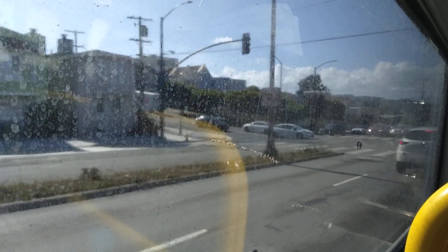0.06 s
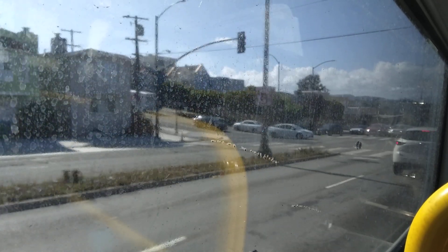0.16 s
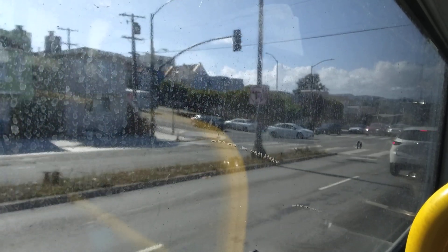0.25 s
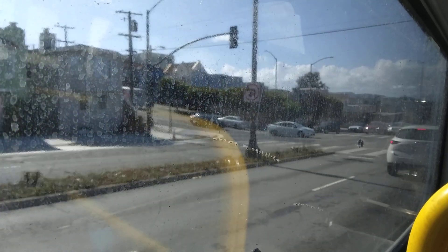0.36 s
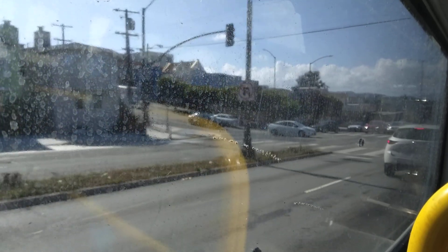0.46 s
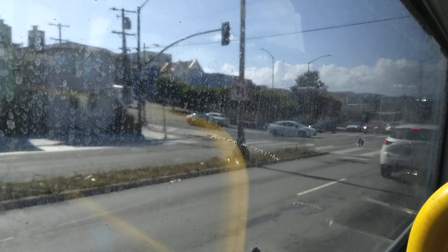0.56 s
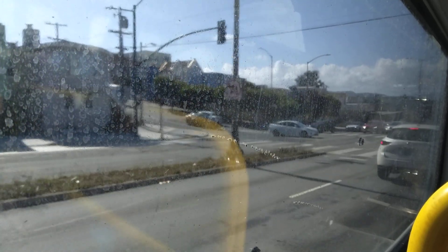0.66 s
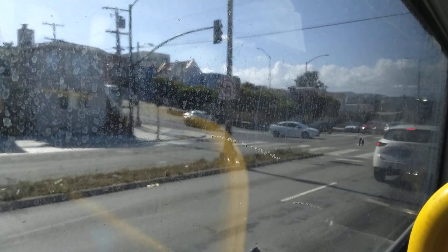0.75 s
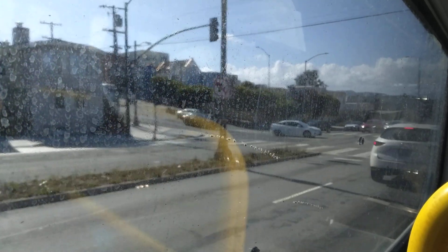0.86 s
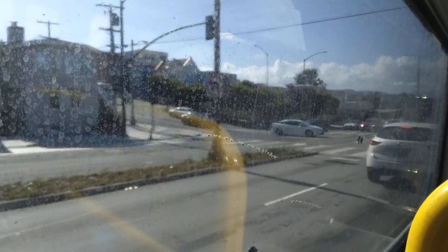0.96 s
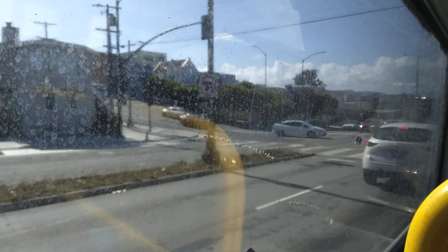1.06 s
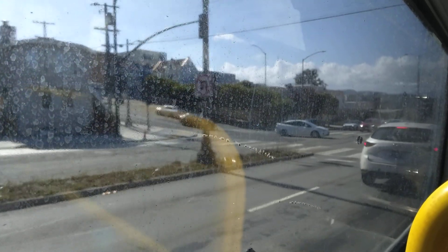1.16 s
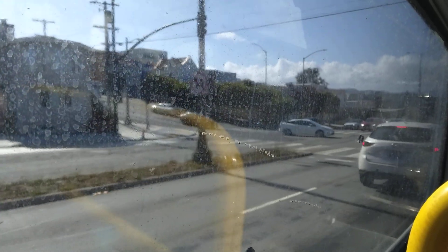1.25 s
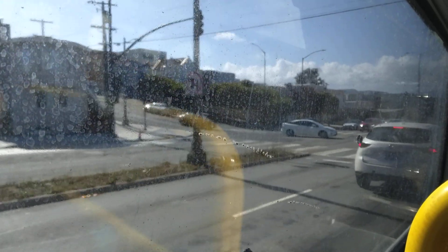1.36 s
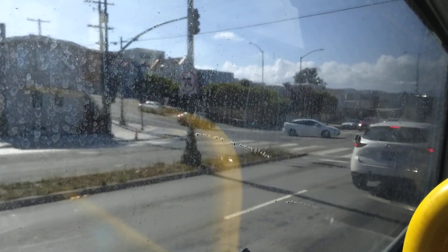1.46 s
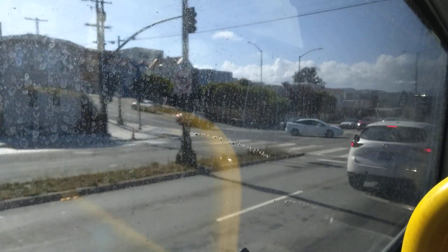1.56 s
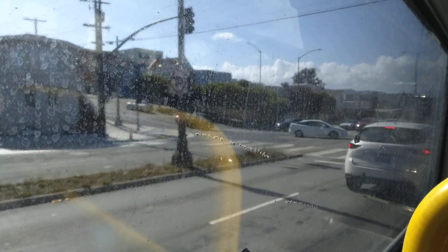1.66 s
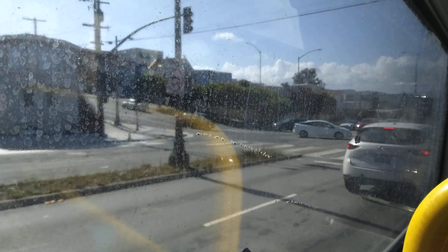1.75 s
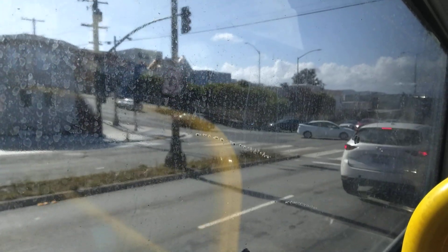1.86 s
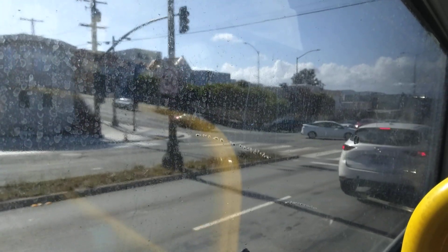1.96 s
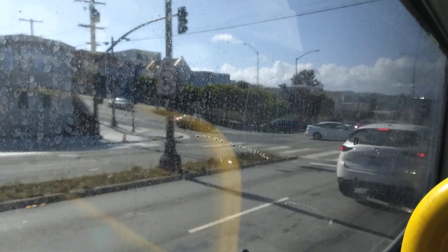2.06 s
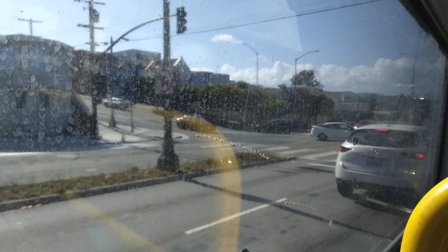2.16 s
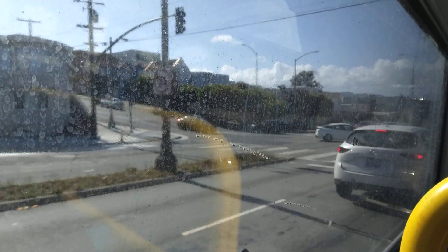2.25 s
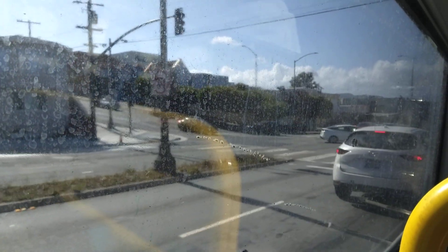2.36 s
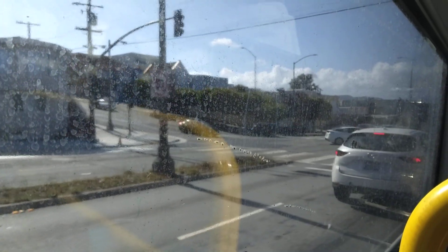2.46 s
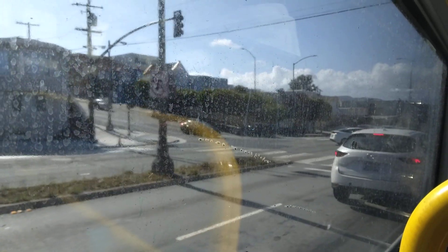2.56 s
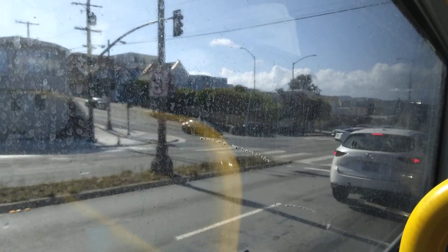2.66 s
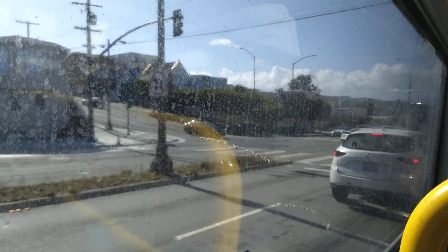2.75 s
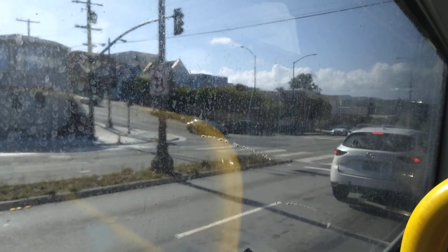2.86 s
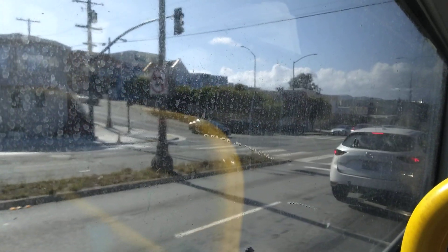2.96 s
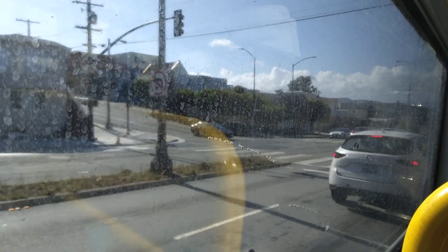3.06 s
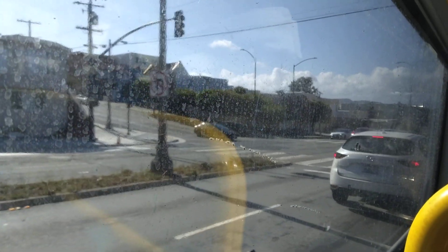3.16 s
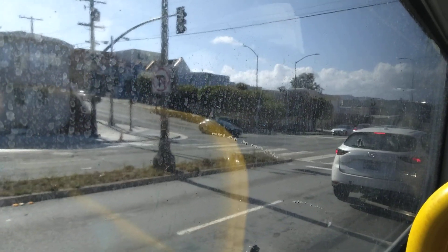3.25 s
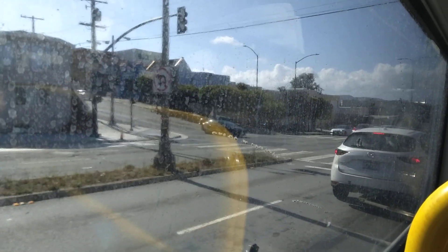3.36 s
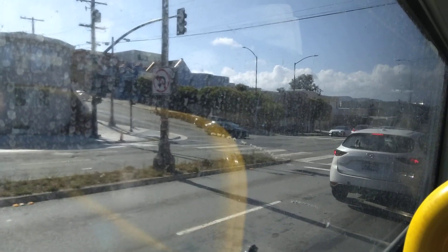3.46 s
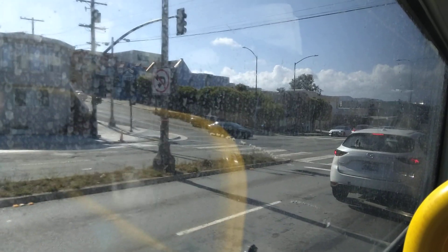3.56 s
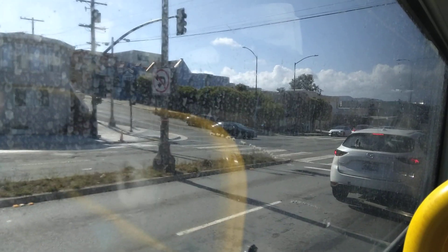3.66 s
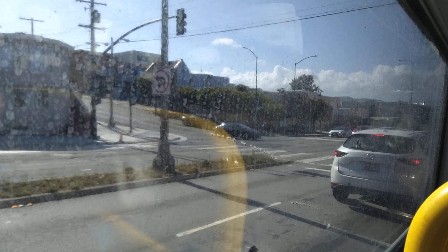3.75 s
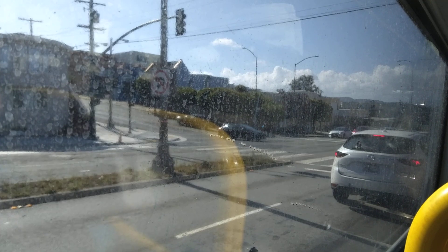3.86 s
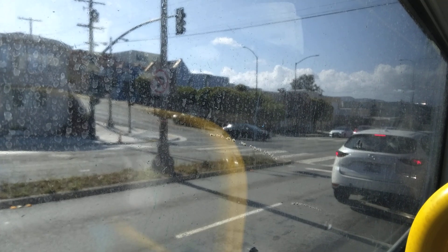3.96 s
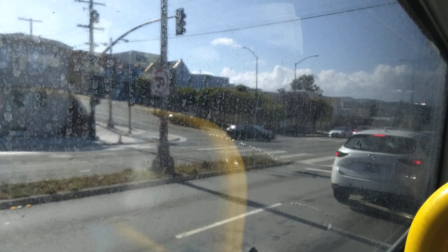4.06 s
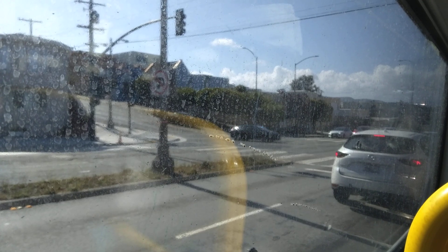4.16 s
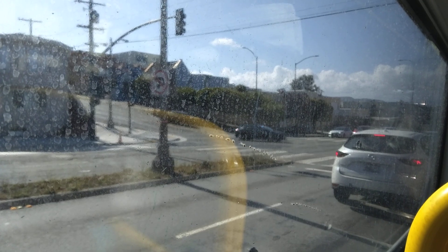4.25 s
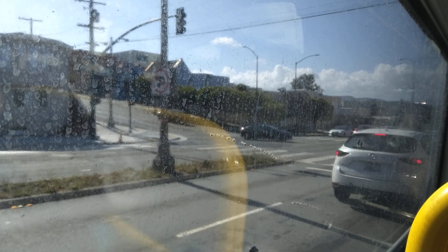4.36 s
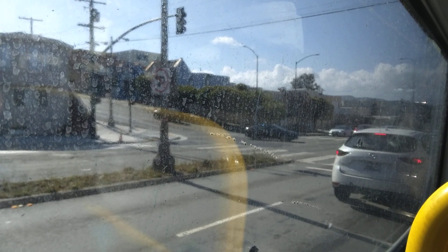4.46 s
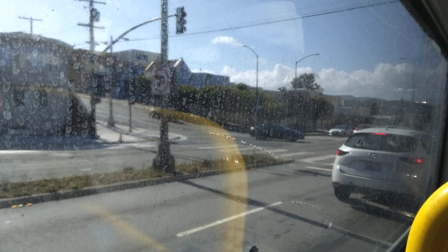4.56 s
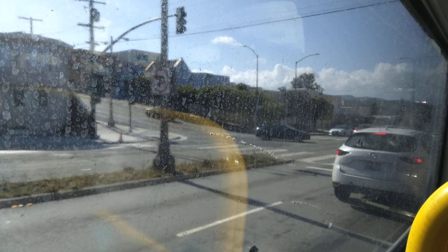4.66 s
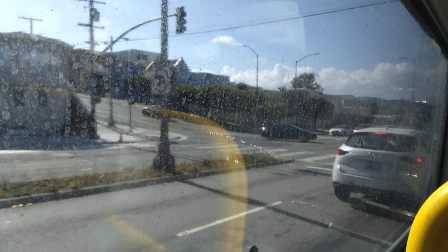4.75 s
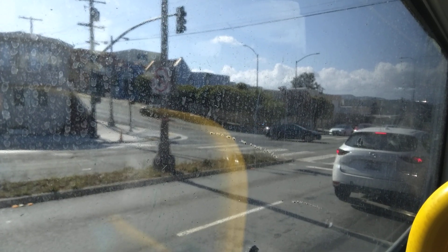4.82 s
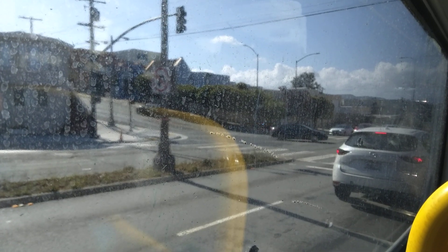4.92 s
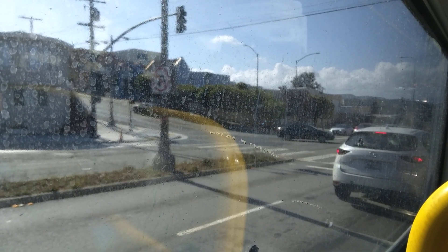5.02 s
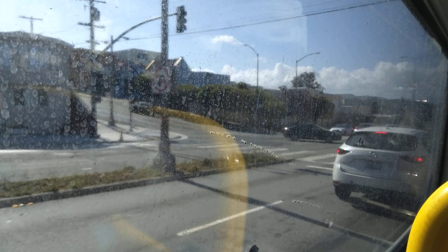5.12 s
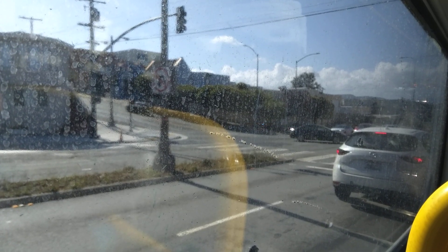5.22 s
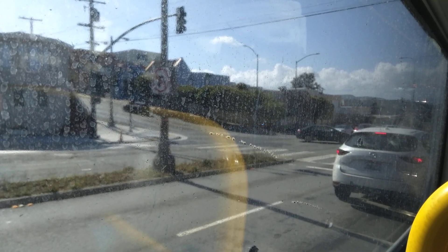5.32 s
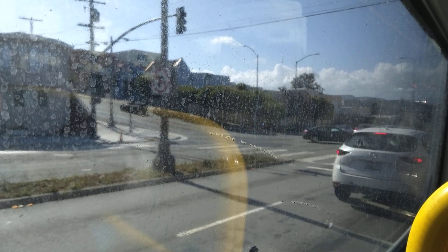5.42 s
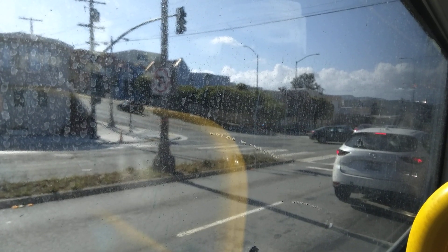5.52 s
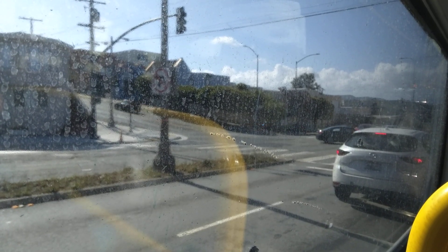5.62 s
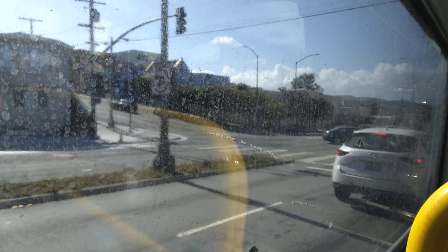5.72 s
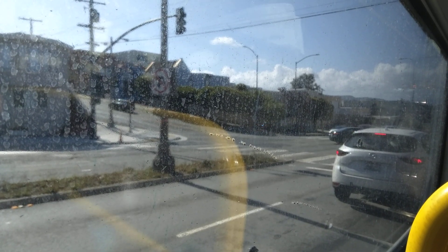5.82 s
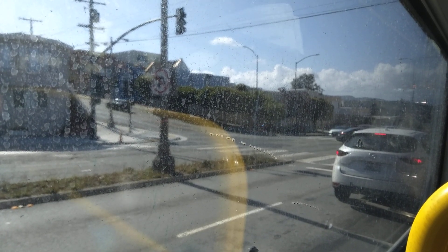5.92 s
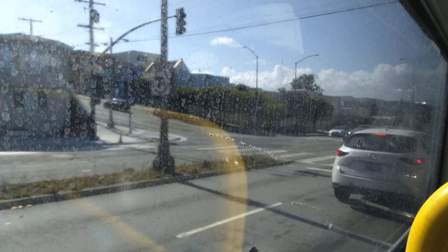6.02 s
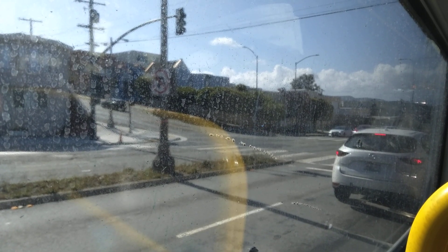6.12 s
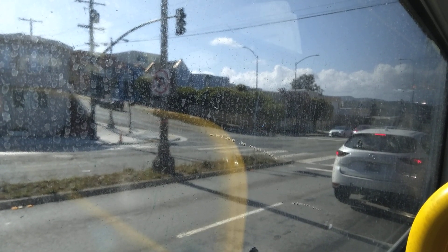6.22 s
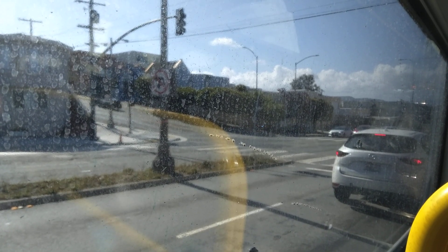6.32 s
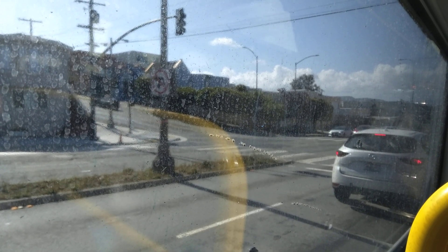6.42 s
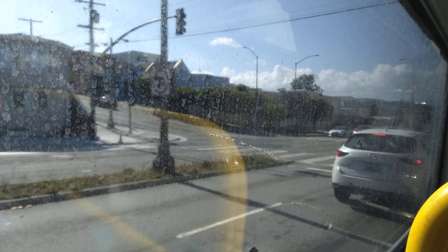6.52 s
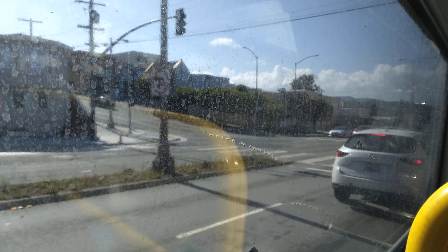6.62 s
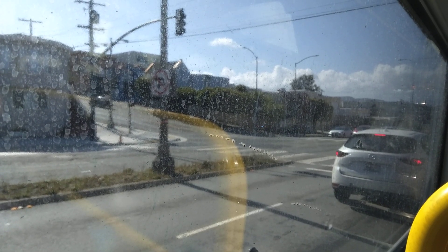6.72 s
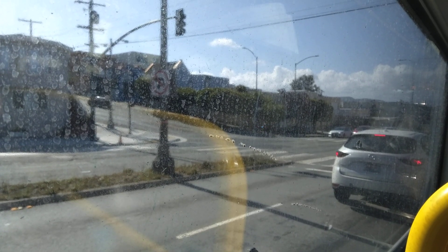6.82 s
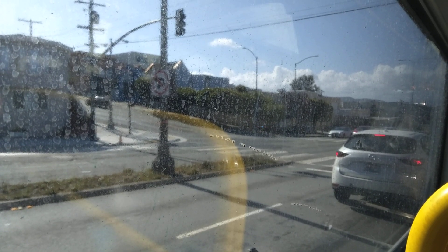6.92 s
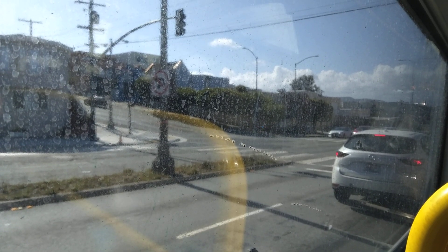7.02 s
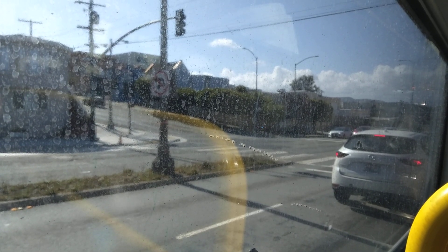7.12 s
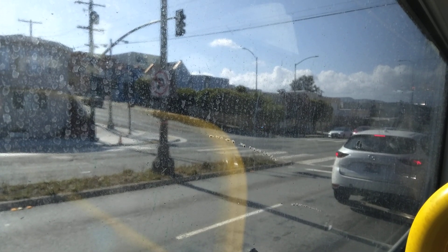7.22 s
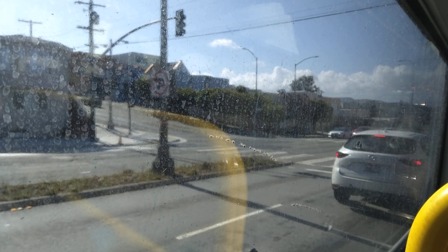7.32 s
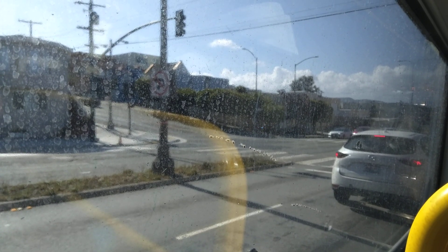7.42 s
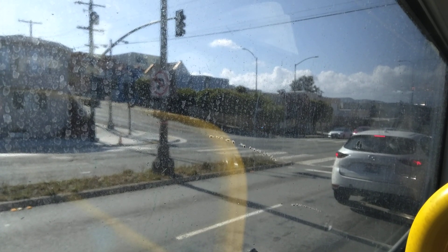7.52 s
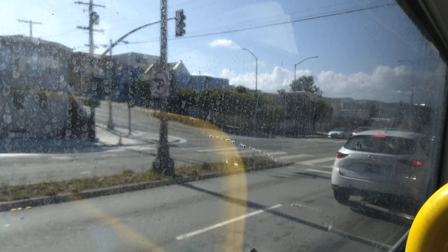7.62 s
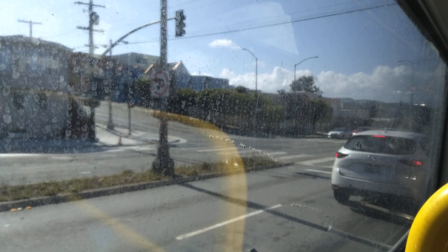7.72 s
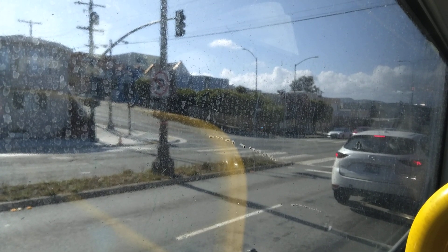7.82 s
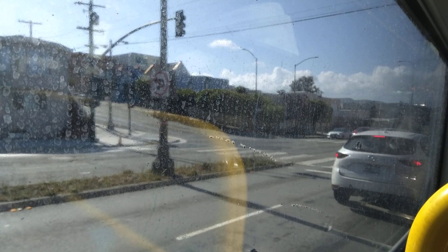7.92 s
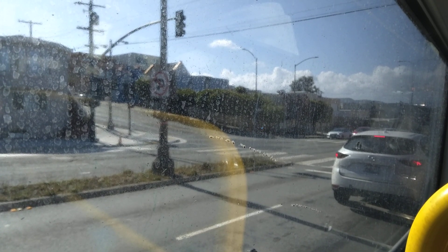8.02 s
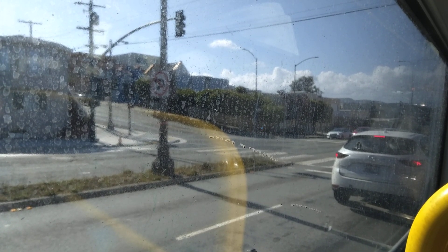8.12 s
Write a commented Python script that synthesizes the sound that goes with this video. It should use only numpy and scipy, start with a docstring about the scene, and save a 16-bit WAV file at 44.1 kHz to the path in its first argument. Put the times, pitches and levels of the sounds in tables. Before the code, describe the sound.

Inside a hybrid bus braking to a halt, an electric motor whine slides down, air hisses, fittings rattle, and a diesel idle drones on.

```python
"""Hybrid city bus braking to a halt

Heard from inside: a six-cylinder diesel idles at 700 rpm, its firings booming in the cabin over clatter.
The drive motor's gear whine falls through the body's resonances and the inverter sings near 8 kHz.
Brake air hisses, fittings rattle, pads rub, chirp and groan, and the body lurches to rest.
Tones are sines that wander in level and phase; hisses, rattles and rumble are coloured noise."""
import sys
import numpy as np
from scipy import signal
from scipy.fft import rfft, irfft
from scipy.io import wavfile
from scipy.ndimage import uniform_filter1d

SR = 44100
rng = np.random.default_rng(int(sys.argv[2]) if len(sys.argv) > 2 else 0)


def dump(signal):
    """Clip the signal to [-1, 1] and save it as 16-bit WAV at the path in sys.argv[1]."""
    limited = np.clip(np.atleast_2d(signal).T, -1, 1)
    pcm = np.round(limited * 32767).astype(np.int16)
    wavfile.write(sys.argv[1], SR, pcm)


N = 360738
TIME = np.arange(N) / SR  # seconds
BINS = np.maximum(np.fft.rfftfreq(N, 1 / SR), 1)  # Hz
CYCLE_HZ = 5.8345  # engine cycles per second, two crank turns each

# The drive motor slowing with the wheels. Each row: time in seconds, gear mesh frequency in Hz.
MOTOR_GLIDE = [(0, 828), (.2, 792), (.5, 703), (1.1, 495), (1.9, 192), (2.7, 5)]


def undb(db):
    """Decibels to gain."""
    return 10 ** (np.asarray(db) / 20)


def unit(x):
    """Scale to rms 1."""
    return x / np.sqrt(np.mean(x ** 2))


def curves(table):
    """Each column of a timed table, sample by sample."""
    s, *columns = np.transpose(table)
    return [np.interp(TIME, s, c) for c in columns]


def across(table, hz):
    """Read (Hz, value) points on a log-frequency axis."""
    f, value = np.transpose(table)
    return np.interp(np.log(hz), np.log(f), value)


def colour(table, hz=BINS):
    """Gain of a spectrum that falls steeply beyond its ends."""
    low_end = 1 + (.8 * table[0][0] / hz) ** 8
    high_end = 1 + (.8 * hz / table[-1][0]) ** 8
    return undb(across(table, hz)) / low_end / high_end


def walk(rate):
    """Smooth random wander of rms 1, with this many new random values per second."""
    k = int(SR / rate)
    steps = np.repeat(rng.standard_normal(N // k + 1), k)
    smooth = uniform_filter1d(uniform_filter1d(steps, k), k)
    return unit(smooth[:N])


def swell(s, spread):
    """A bell-shaped rise and fall around one moment."""
    return np.exp(-.5 * ((TIME - s) / spread) ** 2)


def burst(s, decay):
    """A quick rise to full level half a decay after the knock, then a slower fall."""
    age = np.maximum(TIME - s, 0) / decay
    return 2 * age * np.exp(1 - 2 * age)


def vent(s, hold, decay, attack=.042):
    """A valve opens quickly, stays open, and the pressure runs down (all in seconds)."""
    age = TIME - s
    return np.clip(age / attack, 0, 1) * np.exp(-np.maximum(age - hold, 0) / decay)


def through(resonances, hz):
    """Gain that a gliding tone meets in a set of resonances, summed by power."""
    power = 0
    for centre, width, db in resonances:
        power = power + undb(2 * db) / (1 + (2 * (hz - centre) / width) ** 2) ** 2
    return np.sqrt(power)


def noise(gain, hz=BINS):
    """Stereo noise of a given colour, alike at both microphone ports in the bass."""
    # Likeness of the two ports, clipped to 0-1 below. Each row: frequency in Hz, likeness.
    likeness = [(70, 1.7), (130, 1.3), (250, 0.56), (500, 0.62), (1000, 0.35), (2000, -0.11), (4000, 0.16),
                (11000, -0.23)]
    mid, side = np.exp(2j * np.pi * rng.random((2, len(hz))))
    alike = np.clip(across(likeness, hz), 0, 1)
    both = mid * np.sqrt(1 + alike) + np.array([[1], [-1]]) * side * np.sqrt(1 - alike)
    return unit(irfft(both * gain))


def even(loop, hz):
    """Level a one-cycle loop, octave by octave, as cylinders are nearly alike; the bass stays lumpy."""
    out = 0
    for octave in range(5, 13):  # octave bands centred on 2 ** octave Hz
        band = irfft(rfft(loop) * np.maximum(1 - abs(np.log2(hz) - octave), 0))
        power = uniform_filter1d(band ** 2, loop.shape[1] // 4, mode="wrap")
        strength = .4 if octave > 7 else .1
        out = out + band * (power.mean(axis=1, keepdims=True) / power) ** strength
    return out


def boom(cycle):
    """Six firings a cycle pump the cabin air; the lowest tone eases as load leaves, its octave far less."""
    # Cabin boom around the firing tone. Each row: multiple of the firing rate, level in dB.
    boom_tones = [(.5, -37.5), (1.5, -46), (2.5, -43), (3, -36), (3.5, -45), (4.5, -50), (5, -50),
                  (5.5, -49), (6, -51), (8, -53), (10, -59)]
    loaded_db, idling_db = -21, -29.5
    unload_s, unload_decay_s = 1.77, .49
    firing = 2 * np.pi * 6 * cycle
    load = np.exp(-np.maximum(TIME - unload_s, 0) / unload_decay_s)
    first_db = idling_db + (loaded_db - idling_db) * load
    octave_db = -17.8 + .32 * first_db
    first = undb(first_db + .5 * walk(9)) * np.cos(firing - .2)
    octave = undb(octave_db + .3 * walk(9)) * np.cos(2 * firing)
    out = first + octave
    for multiple, db in boom_tones:
        # short waves reach the seat by many paths and fall out of step with the pulse
        shift = rng.uniform(-np.pi, np.pi) * (multiple != 3)
        tone = np.cos(multiple * firing + shift + .13 * walk(6))
        out = out + undb(db + 1.96 * walk(6)) * tone
    return np.sqrt(2) * out


def clatter(cycle, repeat_db=-38.0, loose_db=-40.5, size=8192):
    """Valves, injectors and gears make the same racket every cycle, with a share that never repeats."""
    # Colour of the idle clatter. Each row: frequency in Hz, relative level in dB per Hz.
    clatter_colour = [(90, 0), (150, -1.05), (200, -5), (270, -5), (350, -11), (520, -11), (620, -12.5),
                      (800, -15), (890, -10.5), (960, -13.5), (1050, -9), (1110, -20), (1300, -22.5),
                      (1800, -22.5), (3000, -39)]
    hz = np.maximum(np.arange(size // 2 + 1) * CYCLE_HZ, 1)
    turn = even(noise(colour(clatter_colour, hz), hz), hz)
    repeated = np.array([np.interp(cycle * size, np.arange(size), port, period=size) for port in turn])
    loose = noise(colour(clatter_colour))
    return undb(repeat_db + .25 * walk(11)) * repeated + undb(loose_db) * loose


def gears(cycle):
    """Timing gears sing in short, rough swells as the load on them comes and goes."""
    # Gear tones. Each row: multiple of the cycle rate, swells per cycle, relative level in dB.
    gear_tones = [(153, 1, -53.3), (180, 2, -51.7), (174, 1, -55)]
    out = 0
    for multiple, swells, db in gear_tones:
        load = (.5 + .5 * np.cos(2 * np.pi * swells * cycle)) ** 2
        phase = 2 * np.pi * multiple * cycle
        ports = np.array([undb(2 * walk(20)) * np.sin(phase + .7 * walk(45)) for _ in range(2)])
        out = out + 2 * undb(db) * load * ports
    return out


def drive(rolling_db=-31, resting_db=-42, inverter_db=-54, lower_mesh_db=.5, upper_mesh_db=-2):
    """Two gear meshes glide down through panels, inverter sidebands close in, road rumble sinks to a floor."""
    # Body panels the whine passes through. Each row: centre in Hz, width in Hz, level in dB.
    panels = [(412, 45, -41.5), (490, 40, -41), (565, 45, -43), (665, 35, -50), (735, 40, -51),
              (803, 35, -43), (1135, 40, -49), (1245, 60, -47), (1420, 150, -55.5), (1800, 300, -53)]
    # Inverter tones. Each row: offset from the carrier in gear mesh frequencies, relative level in dB.
    sidebands = [(-.21, 0), (.21, -3), (-2.5, -2)]
    # Motor casing resonances around those tones. Each row: centre in Hz, width in Hz, level in dB.
    casing = [(6830, 130, -3), (7220, 200, -8), (7900, 200, -.5), (8130, 70, -1.5)]
    # Tyres and body on the road. Each row: frequency in Hz, relative level in dB per Hz.
    road_colour = [(15, -11), (35, -2.5), (70, -2.5), (130, -7), (200, -10.5), (300, -23.5), (700, -33.5),
                   (1700, -38)]
    carrier_hz = 8050
    handover_hz = 236  # below this mesh frequency the motor hands the braking to the pads
    mesh_hz = curves(MOTOR_GLIDE)[0]
    torque = 1 / (1 + (handover_hz / mesh_hz) ** 6)
    mesh = 2 * np.pi * np.cumsum(mesh_hz * (1 + .00312 * walk(25.1))) / SR
    out = 0
    for ratio, mesh_db in ((1, lower_mesh_db), (7 / 3, upper_mesh_db)):
        # standing waves give each port its own level and phase
        ports = np.array([undb(1.8 * walk(30)) * np.sin(ratio * mesh + .7 * walk(45)) for _ in range(2)])
        out = out + np.sqrt(2) * through(panels, ratio * mesh_hz) * undb(mesh_db) * ports
    for offset, db in sidebands:
        phase = 2 * np.pi * carrier_hz * TIME + offset * mesh
        ports = np.array([undb(2.8 * walk(18.1)) * np.sin(phase + .67 * walk(98)) for _ in range(2)])
        out = out + undb(inverter_db + db) * through(casing, carrier_hz + offset * mesh_hz) * ports
    speed = mesh_hz / mesh_hz.max()
    road_level = undb(rolling_db + 2 * walk(7.4)) * speed + undb(resting_db)
    return torque * out + noise(colour(road_colour)) * road_level


def brakes(groan_db=-49, groan_hz=972):
    """Air hisses from the brake valves as pressure runs down; the pads rub, chirp and groan."""
    # Colour of the escaping air. Each row: frequency in Hz, relative level in dB per Hz.
    air_colour = [(1470, -43), (2500, -10), (3520, -4.5), (3950, -6), (5360, -6), (6200, -7), (7860, 0.5),
                  (8420, -7), (9010, -13.5), (9950, -11.5), (10700, -6.5), (12000, -18), (15500, -30.5)]
    # Long air releases. Each row: start in seconds, level in dB, hold in seconds, decay in seconds.
    air_releases = [(-.06, -36, .06, 0.25), (.4, -59, 1.62, 0.81), (2.707, -60.5, 0.084, 0.27),
                    (3.355, -58.5, .15, 0.42), (3.85, -63.5, .08, .4)]
    # Short valve puffs. Each row: centre in seconds, spread in seconds, level in dB.
    puffs = [(.39, 0.015, -53.5), (6.075, 0.0099, -54.5), (6.105, 0.019, -58)]
    # Pads rubbing. Each row: centre in seconds, spread in seconds, pitch in Hz, half-width in Hz, level in dB.
    pads = [(2.12, .035, 4650, 600, -55.5), (2.12, .04, 9600, 1000, -65), (2.5, .1, 4300, 450, -53.5),
            (2.54, .14, 2400, 1400, -51.5), (2.5, .08, 8200, 150, -66)]
    # Pad chirps. Each row: centre in seconds, pitch in Hz, level in dB.
    chirps = [(1.965, 10900, -61), (2.16, 11000, -60), (2.47, 10900, -60), (2.56, 10850, -66),
              (3.18, 11050, -63), (3.61, 11300, -70)]
    flutter = undb(.8 * walk(30))
    released = np.sqrt(sum((undb(db) * vent(s, hold, decay)) ** 2 for s, db, hold, decay in air_releases))
    flow = released * flutter + sum(undb(db) * swell(s, spread) for s, spread, db in puffs)
    out = noise(colour(air_colour)) * flow
    for s, spread, hz, width, db in pads:
        rub = noise(1 / (1 + ((BINS - hz) / width) ** 2))
        out = out + undb(db) * swell(s, spread) * rub
    for s, hz, db in chirps:
        chirp = np.sqrt(2) * np.sin(2 * np.pi * hz * TIME + 1.5 * walk(500))
        out = out + undb(db) * swell(s, .009) * chirp
    groan = swell(2.51, .06) * np.sin(2 * np.pi * groan_hz * TIME + .5 * walk(30))
    return out + undb(groan_db) * groan


def body(sway_db=-25):
    """Fittings chatter in bursts of noise; the body sways while rolling, and thuds and rocks on its springs."""
    # Knocks of loose fittings. Each row: start in seconds, level in dB, decay in seconds.
    rattles = [(.722, -51, .025), (.826, -45.5, .024), (.942, -46, 0.019), (.964, -48, 0.029),
               (1.23, -57, .008), (1.355, -48, 0.014), (1.55, -58, .02), (1.945, -52, .02)]
    # Colour of the fittings. Each row: frequency in Hz, relative level in dB per Hz.
    fitting_colour = [(700, -8), (1500, 5), (3200, 4), (5000, -2), (7500, -4), (9000, -15), (12000, -20),
                      (15000, -38)]
    # Thuds over road seams and on coming to rest. Each row: start in seconds, pitch in Hz,
    # level in dB, decay in seconds.
    lurches = [(.085, 60, -21, .04), (.45, 128, -29, .09), (1.24, 40, -20, .04), (2.712, 55, -11, .045),
               (2.75, 84, -25, .08), (2.79, 22, -22, .17), (2.84, 195, -32, .04)]
    # Sway on the suspension. Each row: frequency in Hz, relative level in dB per Hz.
    sway_colour = [(11, -4), (20, 3), (28, -8), (45, -19)]
    chatter = sum(undb(db) * burst(s, decay) for s, db, decay in rattles)
    thud = 0
    for s, hz, db, decay in lurches:
        thud = thud + undb(db) * burst(s, decay) * np.sin(2 * np.pi * hz * (TIME - s))
    mesh_hz = curves(MOTOR_GLIDE)[0]
    speed = mesh_hz / mesh_hz.max()
    sway = undb(sway_db) * speed * noise(colour(sway_colour))
    return noise(colour(fitting_colour)) * chatter * undb(1.5 * walk(270)) + thud + sway


def ventilation(cycle, level_db=-51.5, throb=.082):
    """Steady cabin hiss that throbs slightly with the firings."""
    # Colour of the vents. Each row: frequency in Hz, relative level in dB per Hz.
    vent_colour = [(710, -23), (1200, -3.5), (1900, -3), (2050, -7), (2620, -8.5), (2860, -11),
                   (3110, -6.5), (4530, -14.5), (5090, -14.5), (6240, -20.5), (8240, -16.5), (9080, -33),
                   (10800, -25.5), (13200, -53), (15500, -51.5)]
    pulse = 1 + throb * np.cos(2 * np.pi * 6 * cycle + np.pi)
    return noise(colour(vent_colour)) * undb(level_db + .95 * walk(6)) * pulse


def scene():
    """All sources at the two microphone ports, each port with its own colour."""
    # Balance of the ports. Each row: frequency in Hz, left minus right in dB.
    port_balance = [(70, 0), (110, -.5), (200, -2.5), (400, 0), (800, 1.5), (1300, 3.5), (2400, 0),
                    (4400, 8), (8000, 14), (9100, -2), (10600, -14), (12000, -12), (13500, 0)]
    cycle = .027 + CYCLE_HZ * TIME + .0005 * walk(2)  # engine cycles turned
    engine = boom(cycle) + clatter(cycle) + gears(cycle)
    cabin = engine + drive() + brakes() + body() + ventilation(cycle)
    fade = np.minimum(np.minimum(TIME, TIME[::-1]) / .005, 1)  # 5 ms at each end
    tilt = undb(np.array([[.5], [-.5]]) * across(port_balance, BINS))
    tilt = tilt / np.sqrt(np.mean(tilt ** 2, axis=0))  # same total power at every frequency
    # the sound reaches the left port 7 samples sooner
    lag = np.exp(-2j * np.pi * BINS * np.array([[0], [7 / SR]]))
    return irfft(rfft(cabin * fade) * tilt * lag, N)


def record(dry, top_hz=15700):
    """The phone cuts the top with a steep low-pass filter."""
    return signal.sosfilt(signal.ellip(10, .1, 80, top_hz, fs=SR, output="sos"), dry)


dry = scene()
out = record(dry)
dump(out)
```